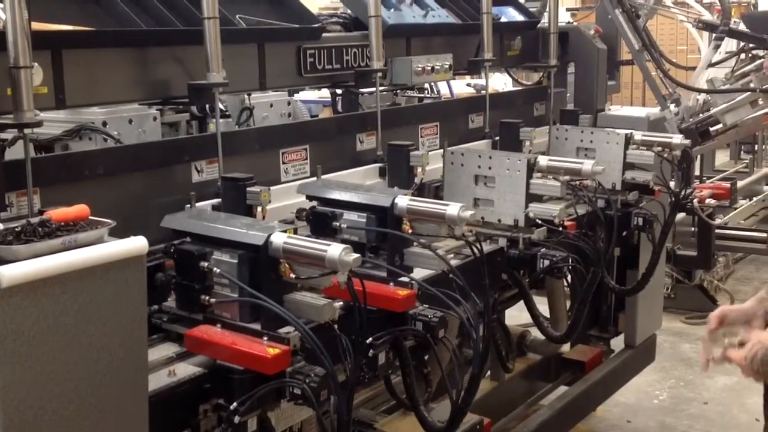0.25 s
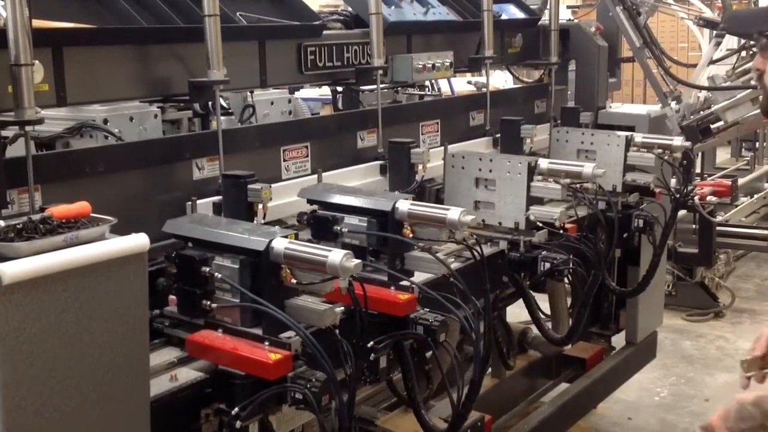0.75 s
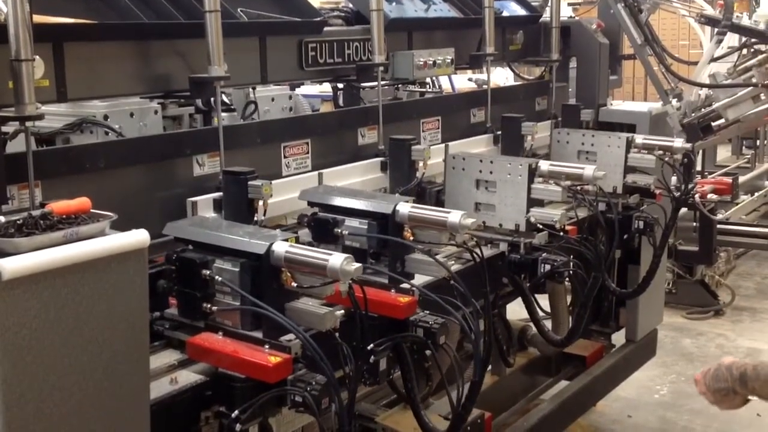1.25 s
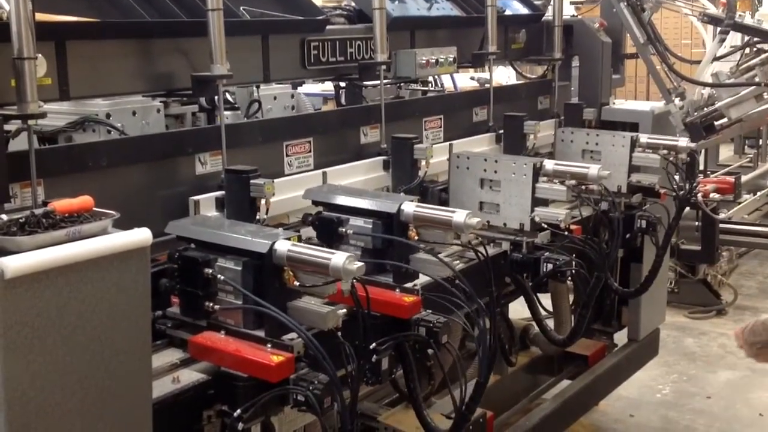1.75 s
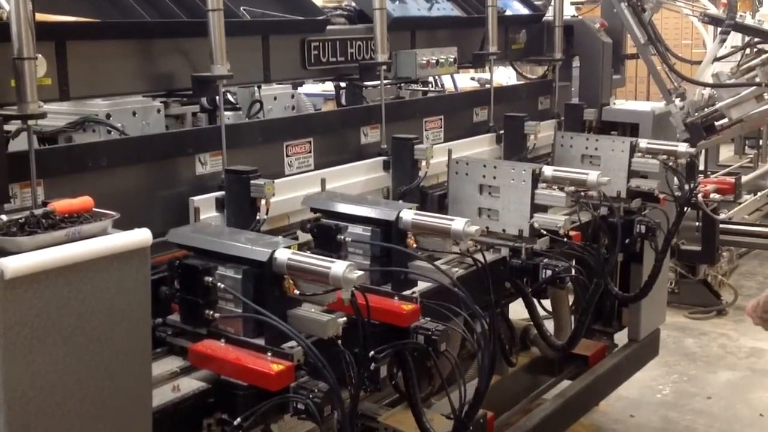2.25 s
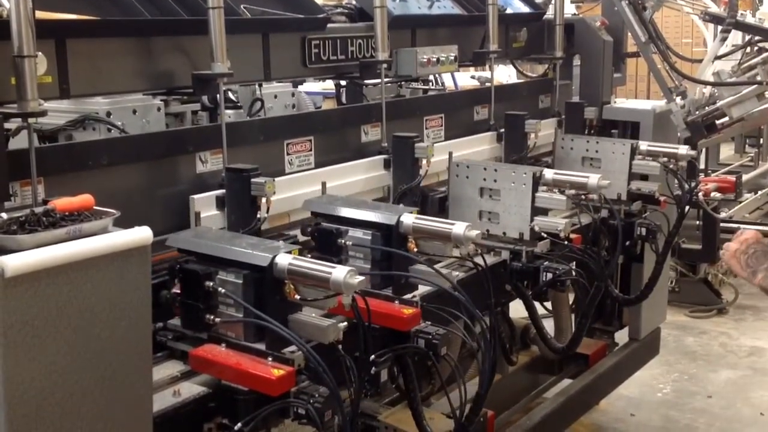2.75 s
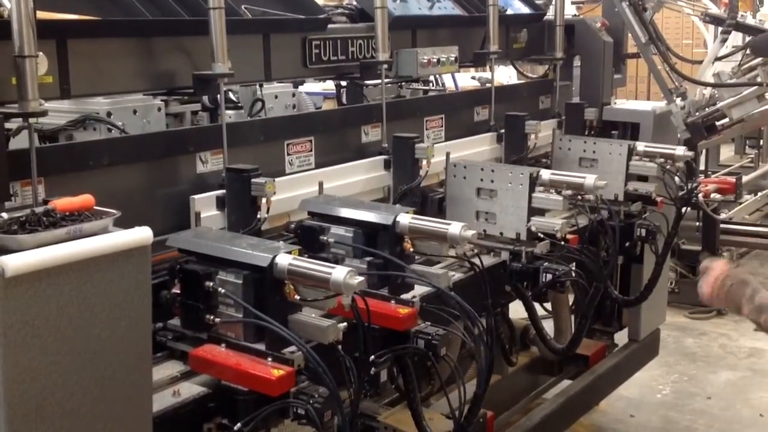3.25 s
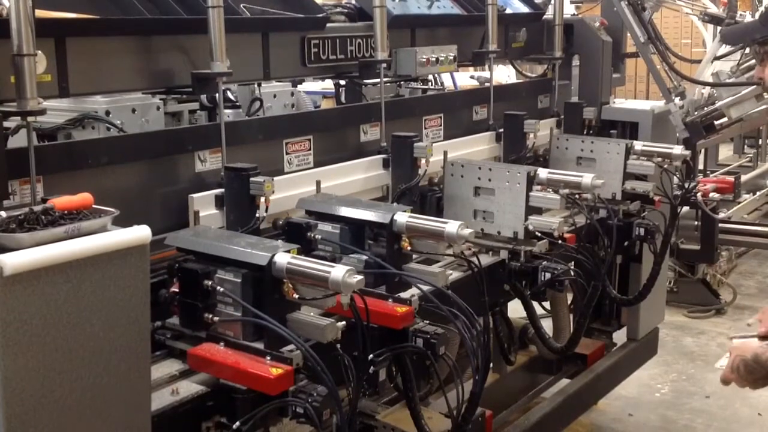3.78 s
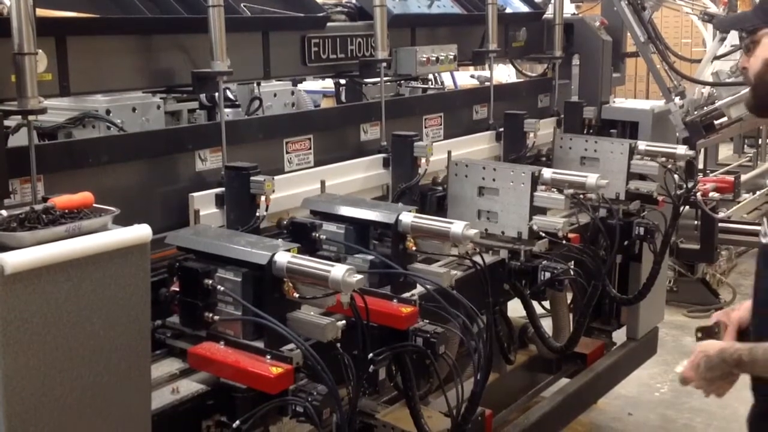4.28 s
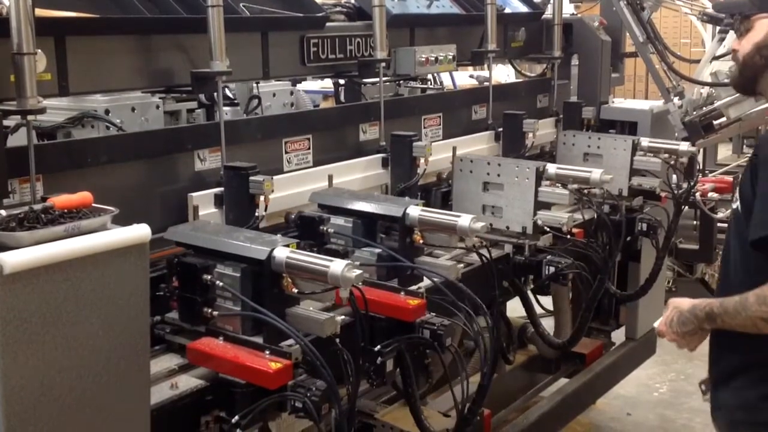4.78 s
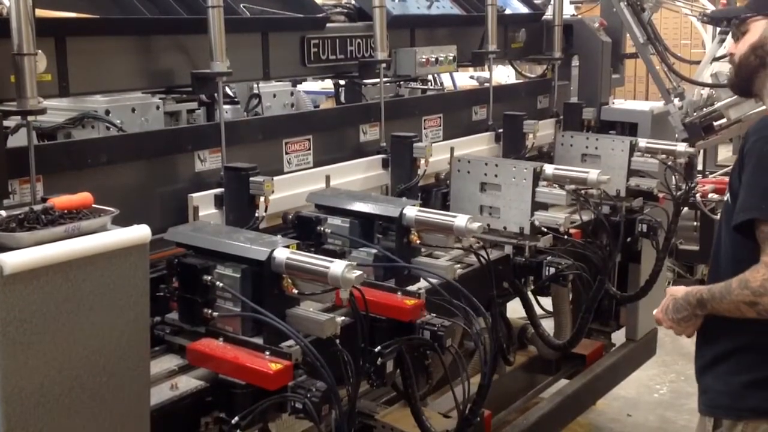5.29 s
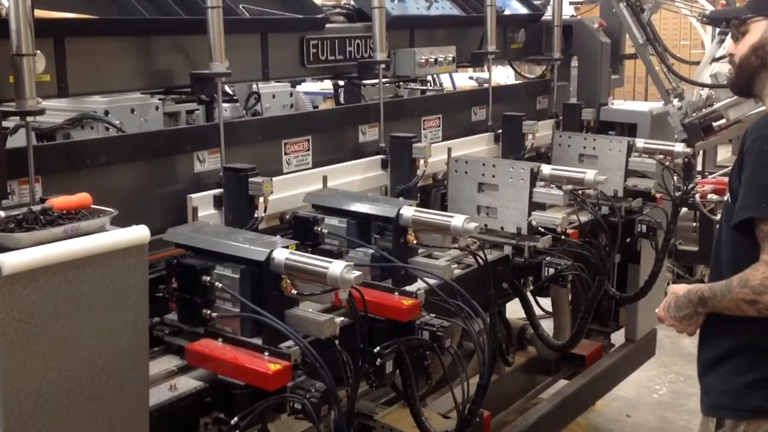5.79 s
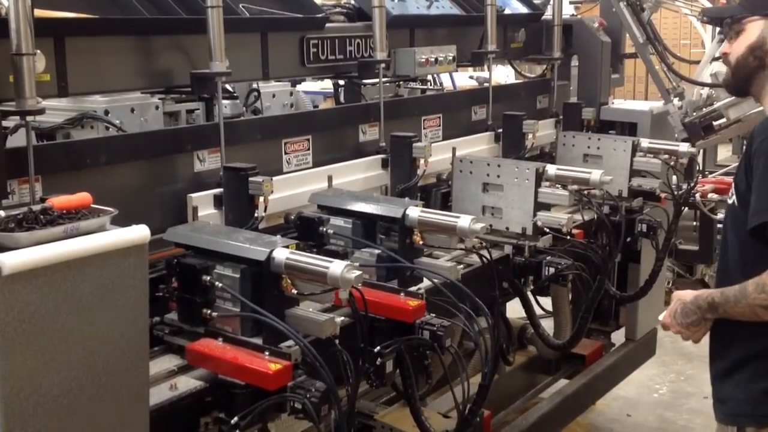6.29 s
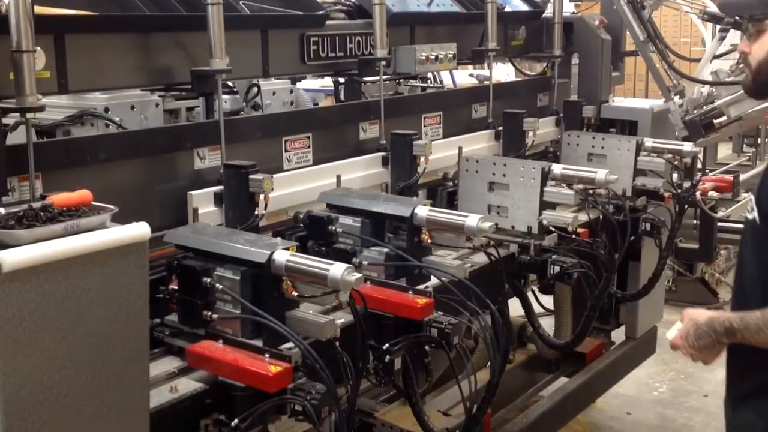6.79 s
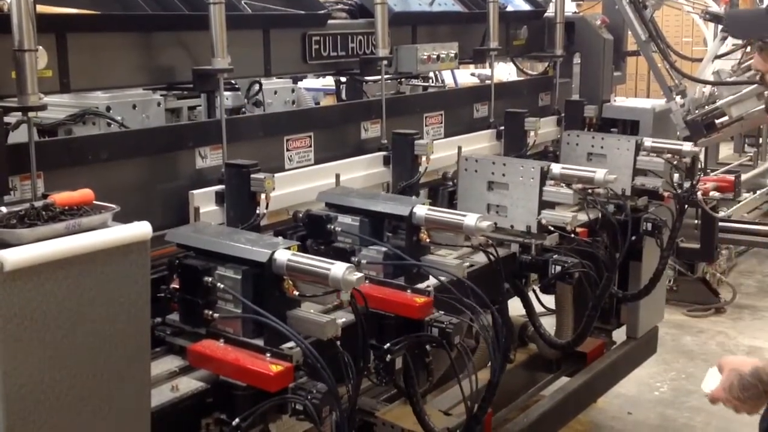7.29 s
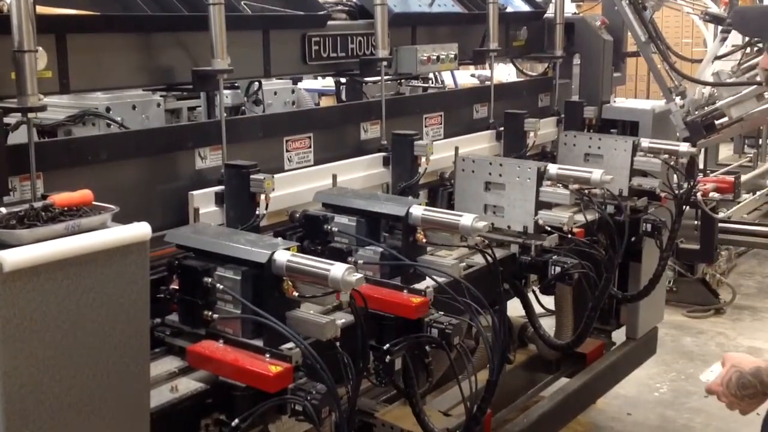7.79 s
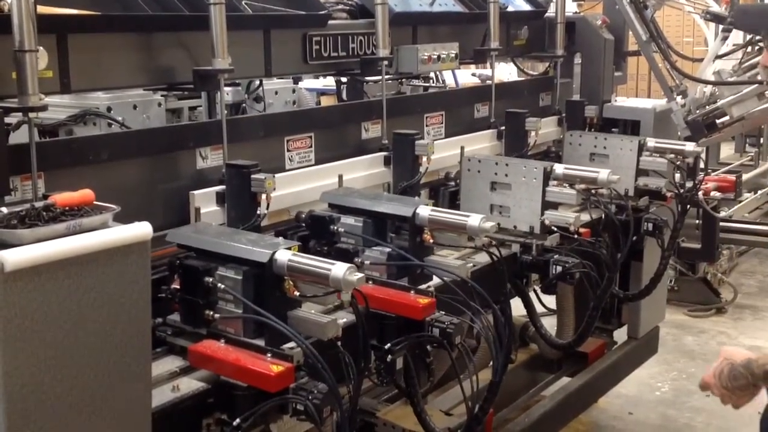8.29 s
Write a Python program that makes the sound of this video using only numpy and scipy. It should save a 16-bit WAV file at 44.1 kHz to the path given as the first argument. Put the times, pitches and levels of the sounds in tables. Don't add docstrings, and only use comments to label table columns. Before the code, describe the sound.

In a workshop, one phone microphone hears a heavy hydraulic cutting machine in a dense, throbbing roar with whining motors and metallic chatter. A spindle sinks in pitch, chatter bites again, compressed air spits brightly, and the motor dies. A small loose part jingles, then an idling pump whines over shop hiss, twice swelling with rushing oil and a short ring.

```python
import sys
import numpy as np
from scipy import signal
from scipy.fft import rfft, irfft
from scipy.io import wavfile
from scipy.ndimage import uniform_filter1d

SR = 44100
rng = np.random.default_rng(int(sys.argv[2]) if len(sys.argv) > 2 else 0)


def put_to_file(sound):
    columns = np.atleast_2d(sound).T
    safe = np.clip(columns, -1, 1)
    whole_steps = np.round(safe * 32767)
    wavfile.write(sys.argv[1], SR, whole_steps.astype(np.int16))


def makeup_ratio(level_db):
    decades = np.asarray(level_db, float) / 20
    return 10 ** decades


N = 376613
T = np.arange(N) / SR

# start_s, pump_hz, motor_hz
MOTOR_SPEED = [(0, 298.7, 257.4), (.5, 298.65, 257.7), (1.2, 298.6, 257.7), (1.32, 298.7, 256.0),
               (1.78, 298.4, 255.9), (1.92, 298.4, 257.5), (2.7, 298.45, 257.6), (2.83, 298.7, 255.2),
               (2.96, 299.0, 249.6), (3.18, 299.1, 248.6), (3.3, 299.2, 243.6), (3.6, 299.4, 241.8),
               (4.15, 299.7, 241), (4.35, 300.6, 241), (8.6, 300.65, 241)]
SUM_TONES = [(0, 1), (1, 1), (2, 1), (3, 1), (2, 2), (1, 3), (3, 2), (4, 1), (2, 4), (4, 2), (5, 1), (4, 3),
             (5, 2), (7, 0), (5, 3), (6, 2), (4, 5), (5, 4), (7, 2), (5, 5), (6, 4), (7, 3), (8, 2), (7, 4),
             (11, 0), (6, 6), (6, 1), (4, 4), (7, 1), (10, 0), (8, 5), (10, 1), (9, 3), (13, 0)]
# start_s, end_s, level_db
LOW_SUM_SPELLS = [
    [(-1, 1.36, -72)],
    [(-1, 1.196, -50.5), (1.27, 1.98, -54.5), (2, 2.88, -51.5), (3, 3.05, -56), (3.05, 3.4, -62)],
    [(-1, 0.87, -49.5), (.9, 1.4, -52.5), (1.41, 1.9, -48.5), (1.97, 2.9, -48), (3, 3.2, -58)],
    [(-1, .95, -41.5), (.95, 1.85, -43), (1.85, 2.45, -42.5), (2.45, 2.75, -45), (2.75, 3.05, -49),
     (3.05, 3.15, -56), (3.28, 3.45, -49.5), (3.45, 3.62, -55)],
    [(1.43, 2.05, -54), (2.92, 3.07, -54), (3.07, 3.3, -58), (3.3, 3.55, -55)],
    [(.5, 3, -53.5)],
    [(-1, .5, -46), (.5, 1.3, -49), (1.5, 2.2, -48), (2.74, 2.93, -48), (2.96, 3.52, -52.5)],
    [(0, 1.54, -52.5)],
    [(.2, 2, -56), (1.95, 2.62, -48)],
    [(-1, .95, -52), (1.5, 1.65, -41), (2, 1.9, -49), (2, 2.92, -44), (3, 3.2, -51.5)],
    [(1.45, 1.8, -50), (2.95, 3.55, -53.5)],
    [(2.7, 2.9, -52), (2.95, 3.22, -48)],
    [(1, 2.1, -60), (2.5, 2.78, -47)],
]
HIGH_SUM_SPELLS = [
    [(2.4, 2.68, -42)],
    [(0, 1.35, -55.5), (1.35, 2.1, -48), (2.1, 2.6, -45.5), (2.6, 2.9, -53), (3.2, 3.55, -60)],
    [(-1, .72, -49), (2.5, 2.82, -49)],
    [(2.05, 2.318, -48)],
    [(-0.5, .6, -55), (2, 2.4, -49), (3, 3.25, -62)],
    [(1.36, 1.62, -49), (1.62, 2.28, -51), (2.95, 3.25, -59), (3.25, 3.55, -58)],
    [(-0.5, 1.1, -51.5), (1.22, 1.45, -47), (1.65, 1.88, -49), (1.8, 2.45, -43), (2.5, 2.9, -52)],
    [(1.4, 1.85, -47), (2.15, 2.6, -52), (2.6, 2.9, -58)],
    [(-1, 0.49, -46), (0.52, 1.17, -50), (1.47, 1.75, -46), (1.6, 2.3, -53), (3.2, 3.55, -62)],
    [(-1, .2, -52), (1.52, 1.92, -47), (1.88, 2.1, -53)],
    [(2.95, 3.25, -55), (3.25, 3.55, -61)],
    [(.9, 1.5, -51.5), (2.1, 2.7, -50.5)],
    [(1.198, 1.8, -49)],
]
# start_s, end_s, level_db
LATE_SUM_SPELLS = [
    [(2.95, 3.5, -62)],
    [(2.95, 3.3, -63)],
    [(2.95, 3.3, -60)],
    [(2.95, 3.55, -62)],
    [(2.95, 3.3, -58)],
    [(3.2, 3.55, -61)],
    [(1.4, 1.8, -56), (2.2, 2.6, -60), (3.2, 3.55, -59)],
    [(2.202, 2.6, -57)],
]

# start_s, tooth_hz, level_db; then its multiples and their level_db
SPINDLE_COAST = [(0, 326.0, -7), (.3, 326.1, -4), (1.2, 326.1, -4), (1.25, 325, -8), (1.32, 319, -9),
                 (1.4, 313, -9), (1.5, 303, -8), (1.62, 288, -10), (1.68, 274, -10), (2.0, 245, -28)]
SPINDLE_ORDERS = [1, 2, 3, 4, 5, 6, 7, 12, 18]
SPINDLE_ORDER_DB = [-58, -58, -58, -53.5, -58, -40.5, -54, -47, -58]
# spindle_on_hz, spindle_off_hz
CHATTER_HZ = [
    (1042, 1030),
    (2186, 2183),
]
# steady_db, gain_db per dB of load surge
CHATTER_LEVEL = [
    (-53, 0.8),
    (-58, 2.5),
]
# start_s, end_s, low_line_db, high_line_db
CHATTER_BOUTS = [
    (0.1, 0.68, -54, -60),
    (0.678, 1.155, -48.5, -43),
    (1.89, 2.294, -49.5, -44.5),
    (2.31, 2.504, -48, -39.5),
    (2.508, 2.62, -43, -34.5),
    (2.658, 2.72, -58.5, -40),
    (2.73, 2.84, -53, -58),
]
# start_s, pitch_hz, level_db
FEED_BRAKE = [
    (2.25, 1340, -86),
    (2.33, 1300, -54),
    (2.42, 1270, -48),
    (2.5, 1210, -58),
    (2.6, 1165, -77.5),
]

# start_s, level_db
EFFORT = [(0, -31), (.3, -32.5), (1.2, -30), (1.45, -32.5), (2.4, -31), (2.75, -31), (2.87, -32),
          (2.94, -36), (3.5, -40.5), (3.56, -41), (3.66, -46.5), (4.0, -50), (4.4, -59)]
# peak_s, gain_db, length_s
THROBS = [(0.82, 1, 0.011), (0.911, 2.5, 0.0065), (1.005, 1.3, 0.01), (1.082, 0.7, .015),
          (1.175, 1.5, 0.017), (1.229, -2, 0.012), (1.274, 3.5, 0.016), (1.327, -2, 0.013),
          (1.369, 3.3, 0.016), (2.29, 1, 0.012), (2.372, 0.3, 0.0081), (2.455, 1.5, 0.0098),
          (2.547, 0.5, 0.025), (2.726, -3, 0.0061), (3.553, 2, 0.0072)]
# pitch_hz, level_db per Hz
ROAR_COLOUR = [(88, -82), (150, -29.5), (433, -25.5), (556, -9.5), (701, -23), (850, -14.5), (936, -13),
               (1160, -4), (1270, -8.5), (1670, -6.5), (2810, -4.5), (9270, -16.5), (15000, -38)]
HISS_COLOUR = [(1500, -47), (3000, -2), (4500, -1), (7000, -0.5), (9000, -4), (12000, -9), (15500, -16)]
# start_s, end_s, pitch_hz, width_hz, level_db
PANELS = [(1.42, 1.75, 1700, 100, -47), (0.77, 1.9, 3600, 260, -50), (.3, 1.5, 2500, 66, -58),
          (1.2, 1.42, 2770, 280, -41.5), (1.4, 1.82, 2860, 140, -49), (1.8, 2.75, 2790, 160, -48),
          (1.3, 1.78, 2980, 370, -46), (1.95, 2.2, 2500, 110, -44), (1.14, 1.41, 1600, 60, -44),
          (1.12, 1.2, 2900, 1000, -39.5), (1.24, 1.5, 550, 38, -52.5), (2.33, 2.72, 2130, 340, -42),
          (2.6, 2.86, 1740, 200, -40.5), (2.72, 3.05, 3580, 240, -47), (2.5, 2.75, 2800, 200, -50),
          (1.34, 1.41, 3100, 1400, -45)]

# its multiples, their resting level_db
WORK_ORDERS = [1, 2, 3, 4, 5, 17, 8, 9]
WORK_REST_DB = [-77.5, -69.5, -78, -73, -70.5, -75, -73, -82]
# start_s, end_s, level_db
WORK_SPELLS = [
    [(-1, .5, -74), (1, 1.62, -65), (3, 3.07, -62), (4.5, 4.85, -77), (5, 5.45, -75), (6, 7.75, -76),
     (8, 9, -72)],
    [(-1, 1.55, -52), (1.85, 2.2, -56), (2.62, 2.8, -60), (2.91, 3.03, -52), (3.03, 3.13, -61),
     (3.13, 3.18, -56), (3.23, 3.95, -55.5), (3.95, 4.12, -61), (5.48, 5.68, -64)],
    [(.7, 2.8, -66), (2.4, 2.69, -51), (3.02, 3.74, -56.5), (3.8, 3.8, -68)],
    [(.3, 2.34, -58), (2.65, 2.92, -52), (3.28, 3.47, -56), (3.52, 3.6, -56), (7.55, 7.82, -66)],
    [(1.1, 2.5, -71), (3.1, 3.55, -57), (4.1, 5.4, -72), (7.8, 9, -73)],
    [(3.4, 3.95, -58)],
    [(3.88, 4.12, -59)],
    [(3.3, 3.5, -55), (3.5, 3.75, -55.5), (3.75, 4.05, -64)],
]
WORK_KICK = [0.028, 0.34, 0.027, 1.2, 0.24, 0, 0, 0]
# resting level_db, then spells of start_s, end_s, level_db
IDLE_REST_DB = [-67, -66, -66]
IDLE_SPELLS = [
    [(3.1, 3.48, -55), (3.48, 3.6, -60), (3.6, 3.72, -54), (3.72, 4.18, -50), (4.18, 4.66, -52.5),
     (4.66, 5.45, -63), (5.5, 6.0, -52), (6.0, 6.7, -59), (7.36, 7.5, -65), (7.5, 9, -53)],
    [(2.78, 3.2, -47.5), (3.3, 4.15, -55.5), (4.15, 4.5, -59), (4.55, 4.93, -53.5), (4.95, 5.47, -64),
     (5.5, 5.75, -54.5), (5.75, 6.05, -51.5), (6.05, 6.5, -55), (6.5, 6.72, -52), (7.4, 8.2, -60.5)],
    [(2.9, 3.25, -60), (3.5, 4.15, -54.5), (4.15, 4.55, -63.5), (4.98, 5.27, -60), (5.45, 5.9, -64),
     (6.45, 6.7, -61), (7.45, 8, -70)],
]
HUM_ORDERS = [7, 8, 10, 11, 14, 16, 9, 24]
HUM_DB = [-74, -70, -66, -68, -72, -72, -74, -79]
# rush_start_s, ring_start_s, ring_end_s, upper_lag_s, rush_db, kick_db
SURGES = [
    (3.5, 3.64, 3.8, .02, -52, -62),
    (5.33, 5.58, 5.88, .01, -48, -57),
    (7.36, 7.58, 7.83, .08, -46.3, -54),
]
# surge_index, idle_multiple; and its level_db
RINGS = [(0, 14), (0, 15), (0, 22), (1, 14), (1, 15), (1, 16), (1, 17), (1, 20), (1, 22), (1, 13), (2, 14),
         (2, 15), (2, 17), (2, 19), (2, 26)]
RING_DB = [-51.5, -58, -57, -55.5, -59, -54.5, -52, -57, -65, -64, -52, -51.5, -61, -61, -65]
# pitch_hz, level_db per Hz
RUSH_COLOUR = [(600, -50), (2000, -18), (3300, -6), (3900, -7), (4200, -1), (4700, 0), (5300, -3),
               (9000, -9.5), (15500, -22)]
# start_s, end_s, pitch_hz, width_hz, level_db
PIPES = [
    (5.37, 5.58, 4150, 300, -52),
    (5.44, 5.6, 4700, 600, -55),
    (5.5, 5.62, 5700, 900, -54),
    (5.93, 6.06, 4800, 120, -58),
    (7.42, 7.62, 4220, 220, -55),
    (7.44, 7.68, 4950, 900, -53),
    (7.52, 7.67, 6000, 700, -53),
    (7.55, 7.72, 7500, 1800, -57),
]

# pitch_hz, level_db per Hz
JET = [
    (2.55, -70),
    (2.7, -48),
    (2.82, -39),
    (2.88, -42),
    (2.93, -54.5),
    (3.02, -51),
    (3.06, -44),
    (3.11, -50),
    (3.3, -70),
]
JET_COLOUR = [(5000, -40), (7000, -18), (8500, 2), (12000, -3), (15000, -11)]
# start_s, pitch_hz, level_db, t60_s
JINGLE = [
    (4.262, 8400, -42, .06),
    (4.273, 6400, -42, .05),
    (4.278, 8500, -43, .07),
    (4.268, 10300, -49, .1),
    (4.3, 8800, -48, 0.034),
]
# start_s, end_s, pitch_hz, level_db
GEARS = [
    (.3, .85, 2756, -53),
    (.1, 1.2, 3370, -53),
]
# pitch_hz, level_db
DRIVES = [(5910, -70), (6600, -72), (7213, -72), (12101, -77), (12941, -80), (13178, -78), (13501, -78),
          (13544, -81), (13716, -80), (14147, -80), (14750, -83)]
# pitch_hz, level_db per Hz
SHOP_COLOUR = [(40, -40), (100, -26.5), (160, -12), (400, -13), (850, -2.5), (1350, -9.5), (1950, -1.5),
               (2700, -6), (3150, -0.5), (3750, -5), (4200, -2), (5000, -3.5), (7600, -4.5), (8300, -7.5),
               (15300, -17.5)]
# pitch_hz, share of the neighbours' power under which a bin is gated
SUPPRESS = [
    (2500, .25),
    (6000, .4),
    (10000, .55),
    (13000, .72),
    (15000, .9),
]


def curves(table):
    s, *columns = np.transpose(table)
    return [np.interp(T, s, column) for column in columns]


def ramp(s, length):
    return np.clip((T - s) / length, 0, 1)


def bell(s, length):
    return np.exp(-.5 * ((T - s) / length) ** 2)


def spells(rows, rest_db, fade):
    gain = makeup_ratio(rest_db)
    for start, end, db in rows:
        gain = gain + makeup_ratio(db) * (ramp(start - fade / 2, fade) - ramp(end - fade / 2, fade))
    return gain


def walk(rate):
    hold = int(SR / rate)
    steps = np.repeat(rng.standard_normal(N // hold + 1), hold)
    return 1.5 * uniform_filter1d(uniform_filter1d(steps, hold), hold)[:N]


def tone(turns, db, wobble_db=2.5, rough=0.17):
    drift = rough * walk(12) + 2 * np.pi * rng.random()
    return np.sqrt(2) * makeup_ratio(db + wobble_db * walk(5)) * np.sin(2 * np.pi * turns + drift)


def noise(colour, flicker_db, rate):
    hz = np.maximum(np.fft.rfftfreq(N, 1 / SR), 1)
    colour_hz, colour_db = np.transpose(colour)
    full = rfft(rng.standard_normal(N)) * makeup_ratio(np.interp(np.log(hz), np.log(colour_hz), colour_db))
    place = 2 * np.log2(hz / 20)
    out = 0
    for k in range(21):
        band = irfft(full * np.clip(1 - abs(place - k), 0, 1), N)
        out = out + band * makeup_ratio(flicker_db * walk(rate))
    return out / np.sqrt(np.mean(out ** 2))


def resonances(rows):
    out = 0
    for start, end, hz, width, db in rows:
        edges = [hz - width / 2, hz + width / 2]
        band = signal.butter(2, edges, "band", fs=SR, output="sos")
        ring = signal.sosfilt(band, rng.standard_normal(N))
        gain = makeup_ratio(db + 1.1 * walk(25.14)) * (ramp(start, 0.031) - ramp(end, 0.033))
        out = out + gain * ring / np.std(ring)
    return out


def motor():
    pump, turn = (np.cumsum(hz) / SR for hz in curves(MOTOR_SPEED))
    rest_db = -66.5 - 8 * ramp(2.9, .05) - 30 * ramp(3.55, .06)
    out = 0
    for (m, n), rows in zip(SUM_TONES, LOW_SUM_SPELLS + HIGH_SUM_SPELLS + LATE_SUM_SPELLS):
        gain = spells(rows, rest_db - 15 * (m == 0), .07)
        order = m + n
        out = out + gain * tone(m * pump + n * turn, 0, wobble_db=.6 + .04 * order, rough=.12 + .06 * order)
    return out


def roar(effort_db):
    blast_end_s = 2.88
    blast_shape = ramp(2.47, .12) - 0.78 * ramp(blast_end_s, 0.045) - 0.33 * ramp(blast_end_s, .3)
    blast = makeup_ratio(-36.5) * blast_shape
    steady_hiss = makeup_ratio(-36.5 + 0.94 * np.minimum(effort_db + 31.5, 0))
    hiss = np.hypot(steady_hiss, blast) * (1 - ramp(3.955, 0.31))
    rumble = makeup_ratio(effort_db - 5.0) * noise(ROAR_COLOUR, 0.29, 15) * (1 - ramp(3.87, 0.38))
    return rumble + hiss * noise(HISS_COLOUR, 1.0, 9.9)


def spindle():
    hz, db = curves(SPINDLE_COAST)
    turns = np.cumsum(hz) / SR
    teeth = zip(SPINDLE_ORDERS, SPINDLE_ORDER_DB)
    return sum(tone(k * turns, db + order_db, wobble_db=.8, rough=0.2) for k, order_db in teeth) * (T < 2)


def chatter(surge_db):
    spindle_off_s = 1.25
    out = 0
    for k, (steady_db, follow) in enumerate(CHATTER_LEVEL):
        rough = np.exp(.6j * walk(60)) * makeup_ratio(2.2 * walk(55))
        bouts = [(row[0], row[1], row[2 + k]) for row in CHATTER_BOUTS]
        gain = spells(bouts, steady_db, 0.052) * makeup_ratio(follow * surge_db)
        turns = np.cumsum(np.where(T < spindle_off_s, *CHATTER_HZ[k])) / SR
        line = np.sqrt(2) * np.imag(rough * np.exp(2j * np.pi * turns))
        out = out + gain * line * (1 - ramp(2.86, 0.096))
    return out


def feed_drive():
    hz, db = curves(FEED_BRAKE)
    return tone(np.cumsum(hz) / SR, db)


def low_pump_hum():
    turns = np.cumsum(curves(MOTOR_SPEED)[0]) / SR
    kick = 0
    for start, *_, kick_db in SURGES:
        kick = kick + makeup_ratio(kick_db) * ramp(start, .03) * np.exp(-np.maximum(T - start, 0) / .32)
    out = 0
    for order, rest_db, rows, share in zip(WORK_ORDERS, WORK_REST_DB, WORK_SPELLS, WORK_KICK):
        gain = spells(rows, rest_db, 0.1) + share * kick
        out = out + gain * tone(order * turns, 0, wobble_db=.9)
    return out


def idling_pump():
    turns = 300.65 * T
    sixth, *upper = (spells(rows, IDLE_REST_DB[k], 0.1)
                     * tone(6 * (k + 1) * turns, 0, wobble_db=.5 + .2 * k, rough=.1 + .1 * k)
                     for k, rows in enumerate(IDLE_SPELLS))
    share = .55 * (ramp(3.55, 0.13) - ramp(4.13, 0.3))
    beat = abs(1 + share * np.exp(2j * np.pi * 6.35 * (T - 3.78))) / np.sqrt(1 + share ** 2)
    whine = sixth * beat + sum(upper)
    for (surge, k), db in zip(RINGS, RING_DB):
        _, start, end, lag, *_ = SURGES[surge]
        late = lag * (k > 14)
        ring = ramp(start + late - .03, 0.063) - ramp(end + late, 0.092)
        whine = whine + ring * tone(k * turns, db, wobble_db=.9)
    for k, db in zip(HUM_ORDERS, HUM_DB):
        whine = whine + tone(k * turns, db)
    return whine * ramp(2.7, .12)


def oil_rush():
    gain = 0
    for start, ring_start, ring_end, _, db, _ in SURGES:
        opening = .6 * ramp(start, .03) + .4 * ramp(start, .2)
        closing = .4 * ramp(ring_start, .05) + .6 * ramp(ring_end, .15)
        gain = gain + makeup_ratio(db) * (opening - closing)
    return gain * noise(RUSH_COLOUR, 1.2, 14)


def air_jet():
    puff = makeup_ratio(-49.5) * bell(4.28, .02)
    return (makeup_ratio(curves(JET)[0]) + puff) * noise(JET_COLOUR, .8, 13)


def jingle():
    out = 0
    for s, hz, db, t60 in JINGLE:
        decay = np.exp(-np.log(1000) * np.maximum(T - s, 0) / t60)
        out = out + makeup_ratio(db) * (T > s) * decay * np.sin(2 * np.pi * hz * T)
    return out


def drives():
    out = 0
    for start, end, hz, db in GEARS:
        out = out + spells([(start, end, db)], -90, .1) * tone(hz * T, 0, wobble_db=1.5, rough=.4)
    return out + sum(tone(hz * T, db, rough=.3) for hz, db in DRIVES)


def shop():
    return makeup_ratio(-44.5) * noise(SHOP_COLOUR, 0.52, 7.1)


def scene():
    effort_db = curves(EFFORT)[0]
    surge_db = sum(db * bell(s, length) for s, db, length in THROBS)
    cutting = roar(effort_db) + motor() + spindle() + chatter(surge_db) + feed_drive() + resonances(PANELS)
    hydraulics = low_pump_hum() + idling_pump() + oil_rush() + resonances(PIPES)
    mono = makeup_ratio(surge_db) * cutting + hydraulics + air_jet() + jingle() + drives() + shop()
    return np.array([mono, mono])


def suppress(x):
    hz, _, z = signal.stft(x, SR, nperseg=1024, noverlap=768)
    recent = uniform_filter1d(uniform_filter1d(abs(z) ** 2, size=12, axis=1), size=2, axis=0)
    around = np.exp(uniform_filter1d(np.log(recent + 1e-18), size=31, axis=0))
    ratio = (recent + 1e-18) / around
    share = np.interp(hz, *np.transpose(SUPPRESS), left=-1)[:, None]
    gain = uniform_filter1d(np.clip((ratio - share) / .08, .05, 1), size=4, axis=1)
    return signal.istft(z * gain, SR, nperseg=1024, noverlap=768)[1][:N]


def treble_flecks(x, count):
    offset = 462
    hz, s, z = signal.stft(np.roll(x, -offset), SR, window="cosine", nperseg=2048)
    side = np.zeros_like(z)
    for place, low, turn in rng.random((count, 3)):
        frame = int(place * len(s))
        band = abs(hz - 4500 - 9500 * low ** 1.2) < 500 + 500 * low
        side[band, frame] = z[band, frame][::-1] * np.exp(2j * np.pi * turn)
    return np.roll(signal.istft(side, SR, window="cosine", nperseg=2048)[1][:N], offset)


def roll_off(x):
    return signal.sosfilt(signal.butter(12, 15290, fs=SR, output="sos"), x)


def record(dry):
    mono = suppress(dry[0])
    side = makeup_ratio(-2.5) * treble_flecks(mono, count=56)
    return roll_off(np.array([mono + side, mono - side]))


dry = scene()
out = record(dry)
put_to_file(out)
```